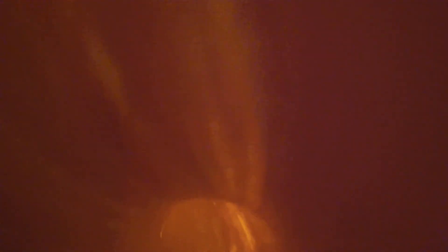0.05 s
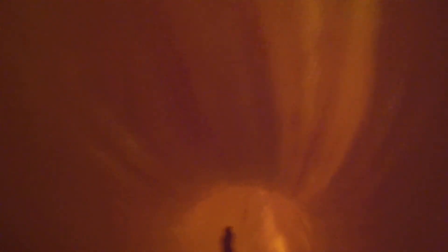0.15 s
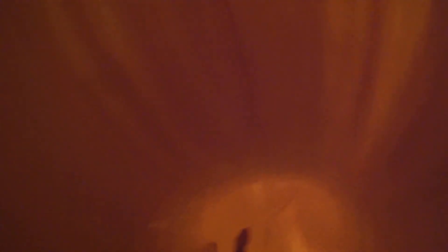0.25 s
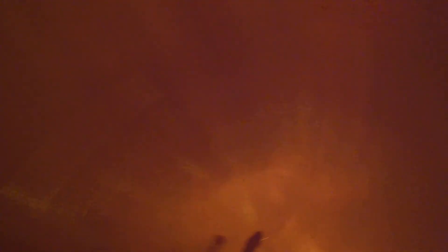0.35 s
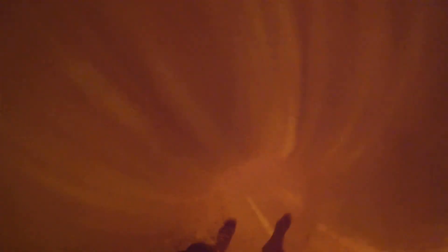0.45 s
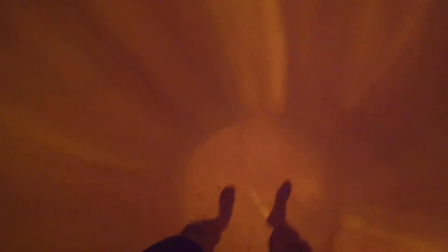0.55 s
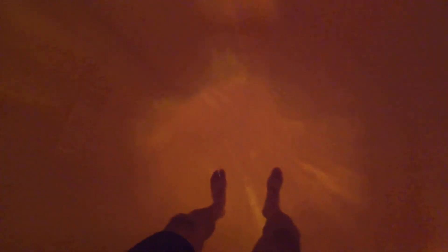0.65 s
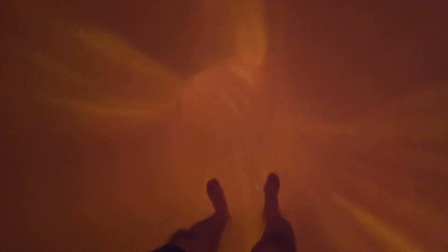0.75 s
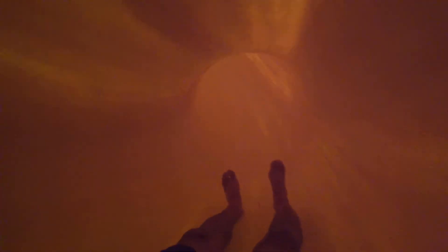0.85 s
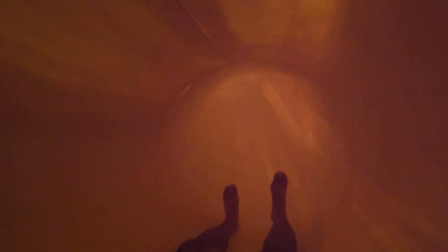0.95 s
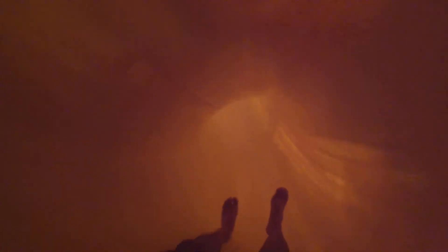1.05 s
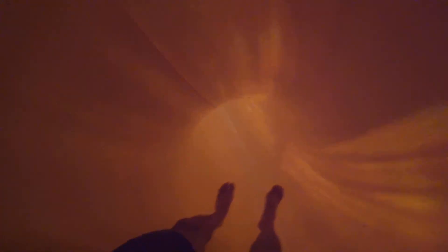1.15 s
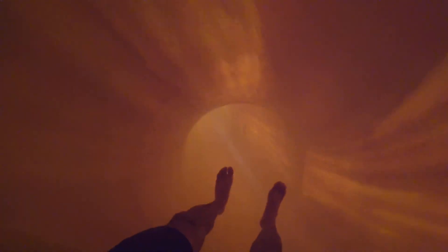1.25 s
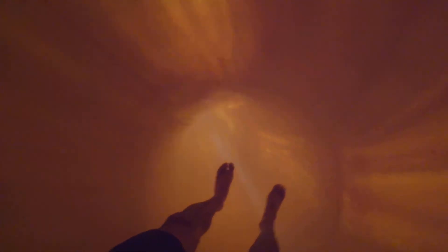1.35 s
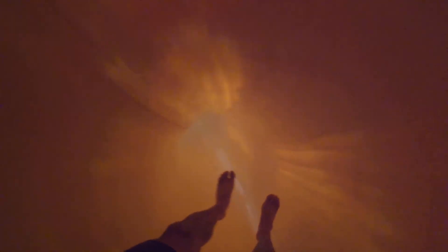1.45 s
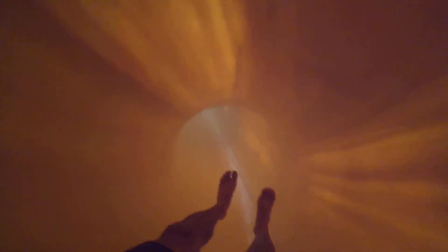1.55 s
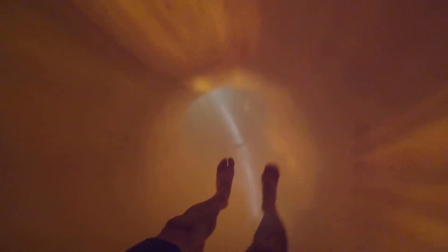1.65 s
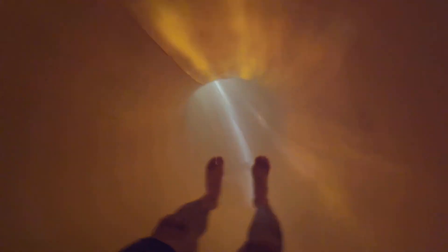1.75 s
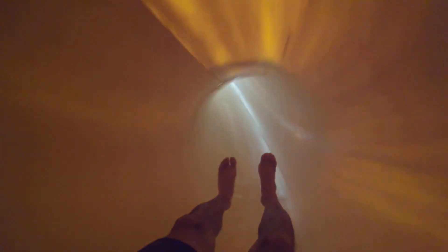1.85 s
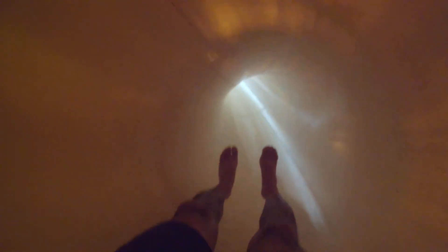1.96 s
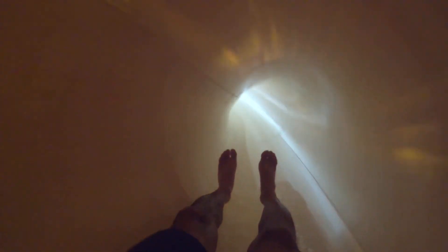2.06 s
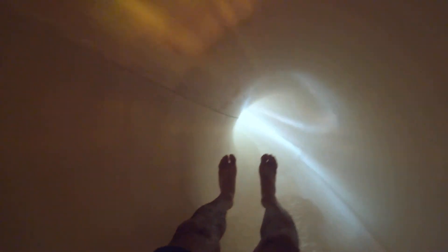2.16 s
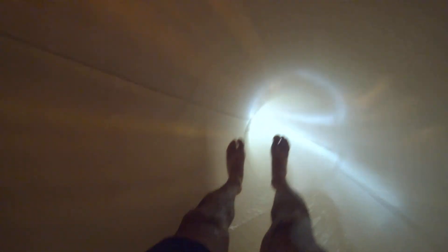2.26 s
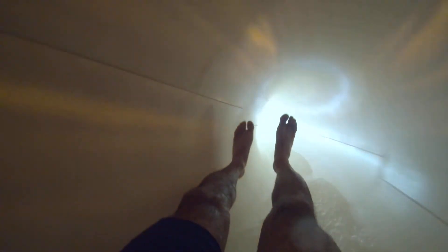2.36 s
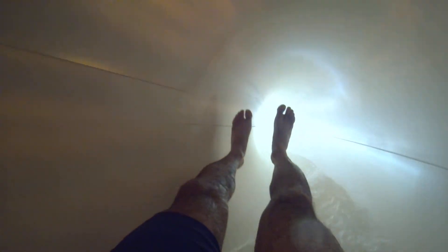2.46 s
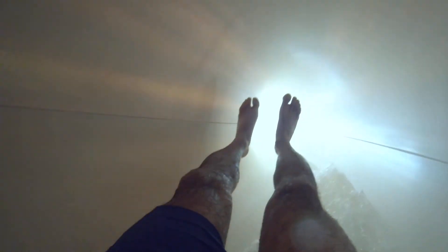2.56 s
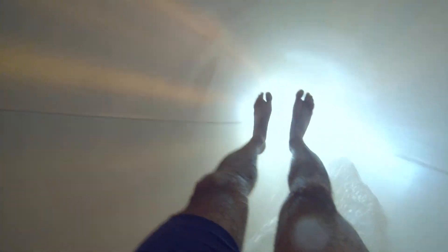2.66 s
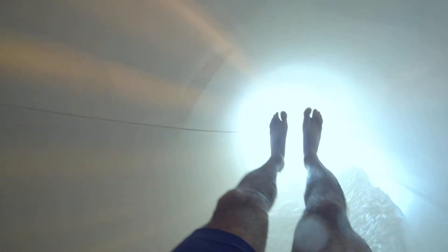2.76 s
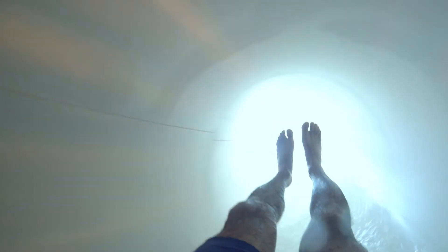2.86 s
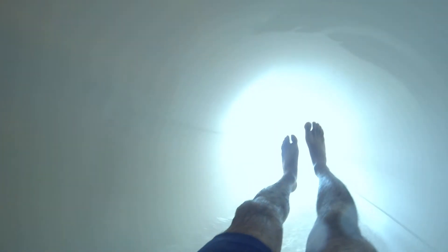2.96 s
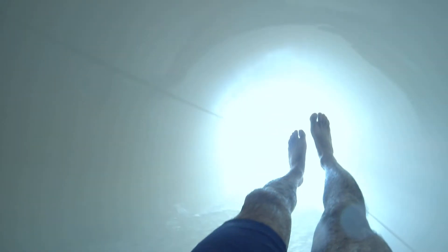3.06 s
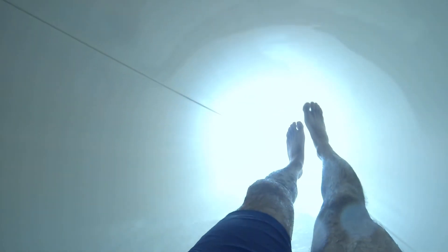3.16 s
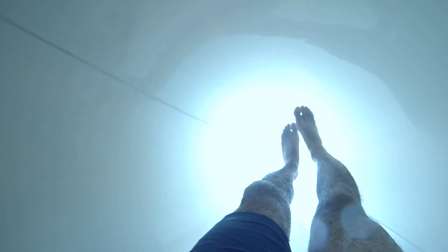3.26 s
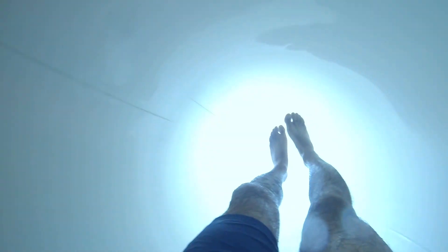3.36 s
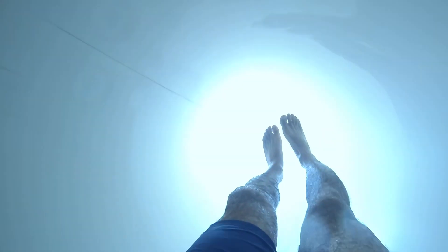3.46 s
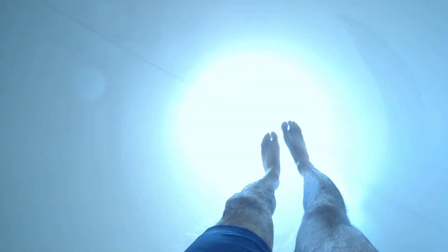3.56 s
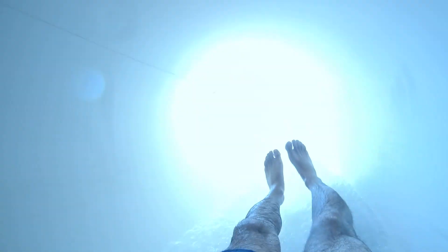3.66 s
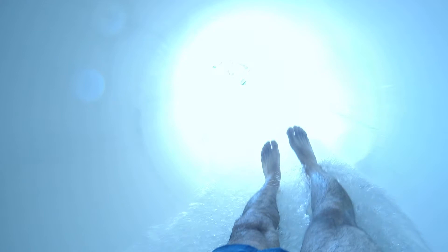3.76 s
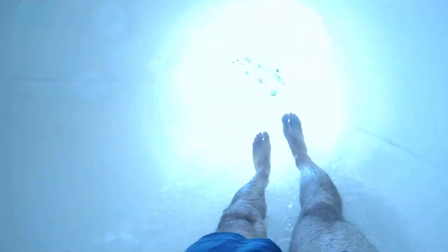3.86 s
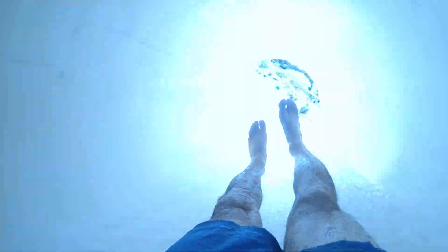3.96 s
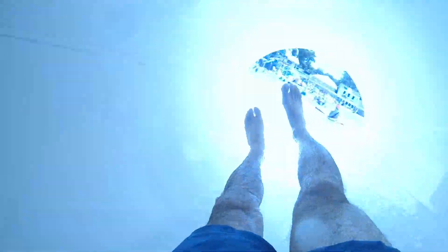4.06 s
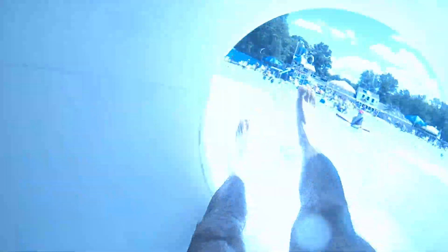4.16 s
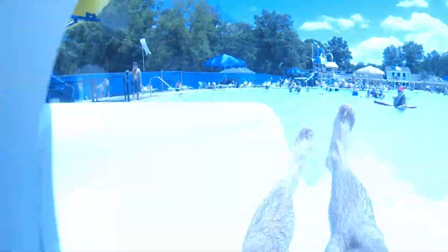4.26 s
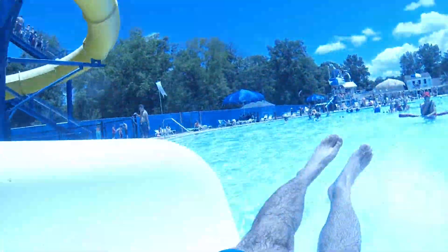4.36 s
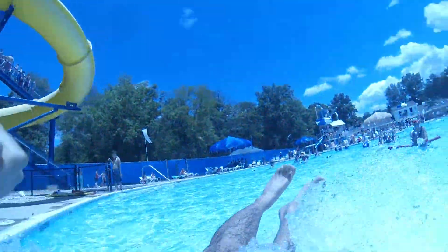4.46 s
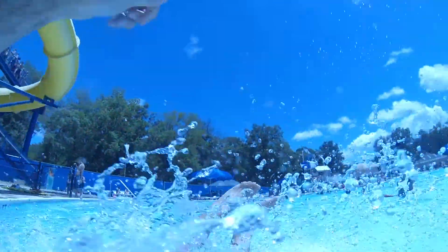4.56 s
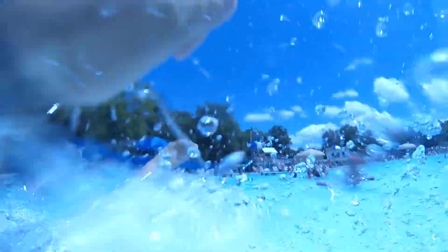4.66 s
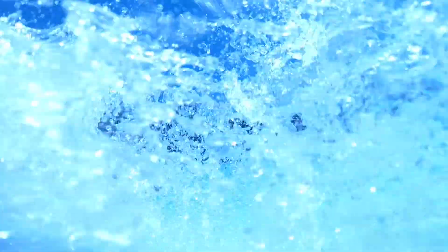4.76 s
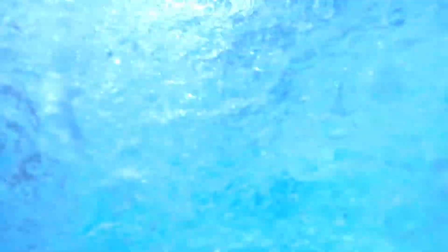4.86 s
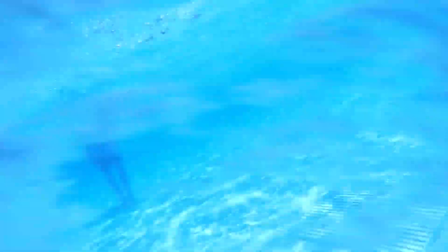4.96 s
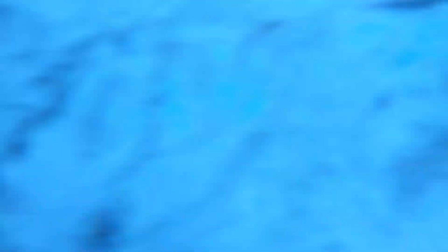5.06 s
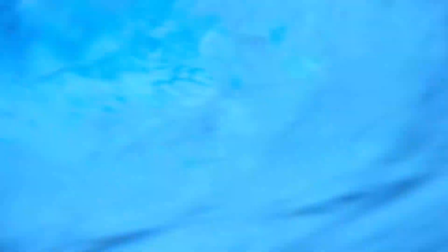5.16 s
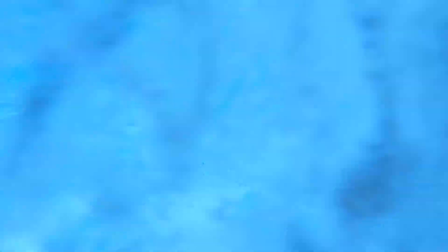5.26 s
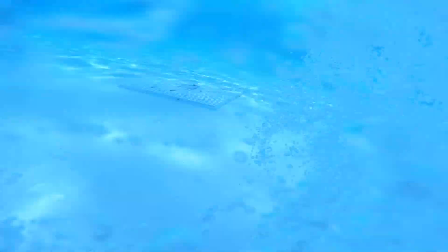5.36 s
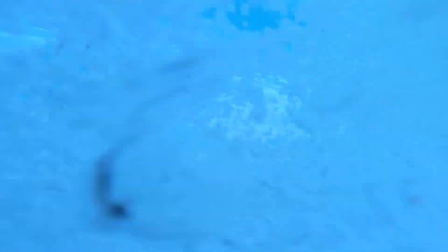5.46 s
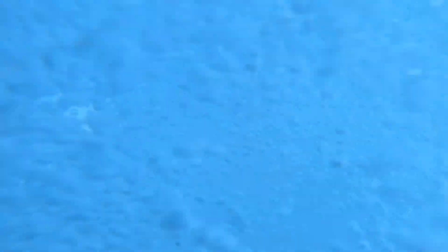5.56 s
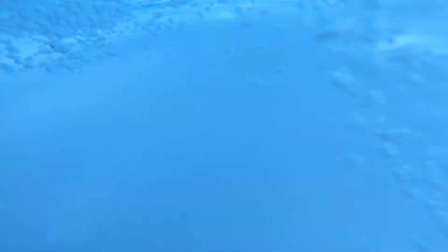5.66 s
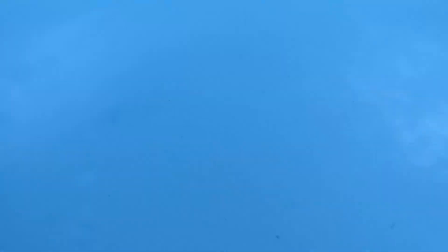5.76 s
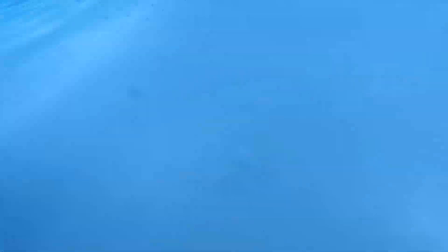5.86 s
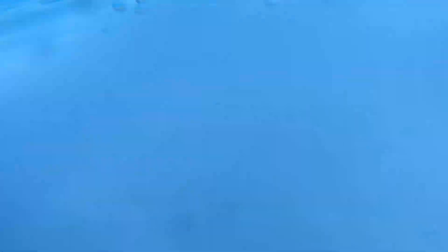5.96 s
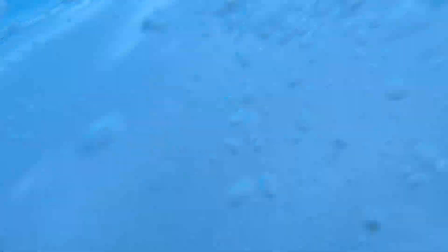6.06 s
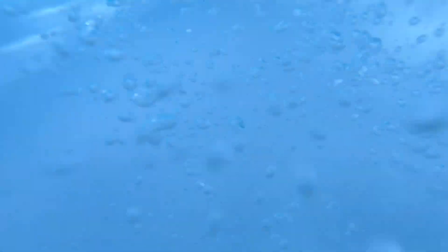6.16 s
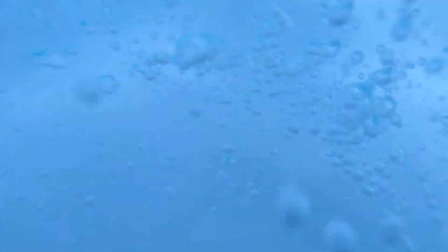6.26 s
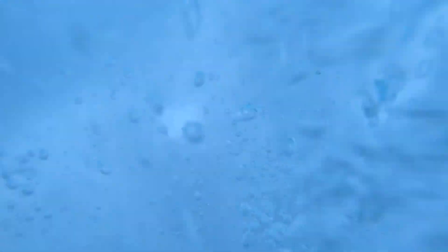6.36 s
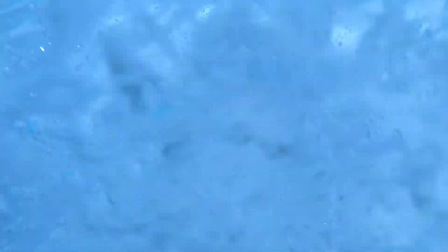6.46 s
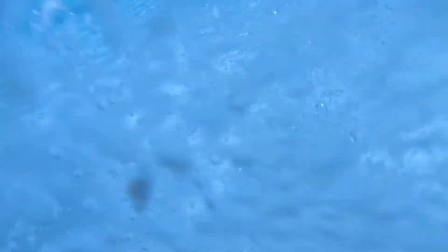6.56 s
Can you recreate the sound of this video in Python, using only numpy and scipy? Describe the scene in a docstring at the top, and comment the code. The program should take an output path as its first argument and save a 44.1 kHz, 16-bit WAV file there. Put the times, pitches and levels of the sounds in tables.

```python
"""Water hisses and a deep rumble and knocks shake a small camera in a sealed housing on a tube water slide.
Then it plunges into a pool: ragged spray, gurgle, tiny bubbles and hard blows of water on the microphone port.
Hiss and spray are noise shaped by droplets and by the housing; rumble, wash and hum are filtered noise.
Slosh, bubbles, snaps and blows are built from many short fading swings, each laid in at its own time.
At listed moments the steady sound drops quickly and climbs back."""
import sys
import numpy as np
from scipy import signal
from scipy.fft import rfft, irfft
from scipy.io import wavfile
from scipy.ndimage import uniform_filter1d

SR = 44100
rng = np.random.default_rng(int(sys.argv[2]) if len(sys.argv) > 2 else 0)


def file_out(sig):
    """Save sig as 16-bit WAV at sys.argv[1]."""
    # one column per channel
    cols = np.atleast_2d(sig).T
    # limit, then scale
    lim = np.clip(cols, -1, 1)
    pcm = np.round(lim * 32767).astype(np.int16)
    wavfile.write(sys.argv[1], SR, pcm)


N = 291494  # length in samples

# Water hiss before the dips. Each row: time in seconds, level in dB, brightness (treble level) in dB.
HISS_CURVE = [(0.0, -38.5, -12.5), (0.1, -29.5, -14), (0.7, -33.5, -11), (1.05, -24.5, -15.5),
              (1.6, -29.5, -15), (2.0, -32, -15.5), (2.3, -28.5, -16), (2.57, -29, -16.5), (2.75, -32, -14),
              (3.33, -29, -16), (3.75, -43, -12.5), (4.0, -30, -15.5), (4.42, -21, -15.5),
              (4.52, -28.5, -15), (4.68, -39.5, -11), (4.73, -22, -2), (4.78, -26, -7), (4.84, -17.5, -5),
              (4.88, -14.5, -6.5), (4.9, -11, -11.5), (5.05, -19, -9.5), (5.23, -33.5, -12),
              (5.27, -21.5, -14.5), (5.35, -26, -17), (5.69, -36.5, -10), (5.85, -49.5, -10),
              (5.89, -54, -31), (6.03, -43, -2), (6.09, -60, -19), (6.15, -48, -26), (6.26, -56, -13),
              (6.33, -17.5, -10.5), (6.45, -14, -6.5), (6.57, -30.5, 2.5), (6.61, -19.5, -13)]
# Low sounds before the dips. Each row: time in seconds, rumble in dB, slosh in dB, gurgle in dB.
LOW_CURVE = [(0.0, -25, -34, -46.5), (0.12, -14, -32, -44.5), (0.6, -10.5, -47, -48.5),
             (0.9, -21, -44, -42.5), (1.13, -12.5, -44, -40), (1.7, -18, -41, -47.5),
             (1.94, -10, -39.5, -43), (2.3, -21, -42.5, -46.5), (2.6, -22, -44.5, -47),
             (3.15, -22, -50, -43), (3.5, -11.5, -47, -48.5), (4.0, -19.5, -52, -48),
             (4.25, -14.5, -35, -35), (4.45, -12, -20.5, -31), (4.56, -5, -12, -40),
             (4.64, -17.5, -28, -40), (4.75, -13.5, -20, -36), (4.9, -18.5, -26, -22.5),
             (5.05, -17, -10.5, -19.5), (5.15, -30, -24, -32.5), (5.34, -19.5, -21, -17),
             (5.6, -27, -17.5, -25.5), (5.7, -22, -18, -25), (5.755, -26, -28, -46),
             (5.77, -23, -23, -26.5), (5.9, -28, -30, -37.5), (6.01, -31, -35.5, -44),
             (6.14, -23.5, -30, -31), (6.22, -23, -28, -34), (6.24, -19, -25, -28), (6.3, -22.5, -29, -27),
             (6.61, -25, -29, -23.5)]
# Colour of the rush inside the tube. Each row: frequency in Hz, relative level in dB.
TUBE_SPECTRUM = [(410, -28), (700, -23.5), (884, -24), (1130, -16), (1290, -2), (1470, -2), (1760, -13.5),
                 (2080, -13.5), (2310, -17.5), (3630, -20), (4350, -24), (5790, -26), (6340, -27),
                 (13400, -49), (15500, -49)]
# Colour of the spray in the pool. Each row: frequency in Hz, relative level in dB.
POOL_SPECTRUM = [(410, -27), (700, -14.5), (1010, -0.5), (1250, -1.5), (1430, 3), (1850, 0), (2590, -9),
                 (3630, -8), (4520, -15.5), (7500, -26.5), (8540, -30.5), (12900, -39), (15500, -44)]
# Fine colour of the housing. Each row: centre in Hz, width in Hz, boost or cut in dB.
HOUSING_COLOUR = [(2080, 30, 2), (4390, 150, -5.5), (4810, 110, 1.5), (6270, 89, -6), (10900, 370, 1.5),
                  (13100, 330, 3.5)]
# Air resonances across the tube. Each row: centre in Hz, width in Hz, relative level in dB.
TUBE_HUM = [(219, 70, -6.5), (514, 76, -8.5), (704, 130, -12)]
# Air pocket behind the port. Each row: pitch in Hz, relative level in dB, time to fade by 60 dB in seconds.
AIR_POCKET = [(1560, 9.5, 0.0058), (2145, 10.5, 0.0028), (3440, -7.5, 0.0095)]
# Drops and bubbles snapping at the port. Each row: start in seconds, level in dB,
# treble crack in dB relative to the body of the snap.
PORT_SNAPS = [(3.0952, -11.5, -31), (4.4176, -7, -46), (4.5305, 2.5, -9.5), (4.561, -14.5, -8.5),
              (4.594, -35, -13), (4.6044, -18, -19), (4.6116, -35, 1), (4.6503, -20, -34),
              (4.6795, -16.5, -21), (4.7153, -10.5, -6), (4.7368, -6.5, -18), (4.839, -2.5, -12),
              (5.1762, -15.5, -24), (5.2689, -16, 1), (5.372, -22, -25), (5.3948, -16, -29),
              (5.466, -15, -24), (5.5537, -17, -35), (5.697, 7, -41), (5.7654, -22, -28),
              (5.7935, -25.5, -33), (5.8144, -33, -7.5), (5.8287, -39, -17), (5.8464, -41, -28),
              (5.9434, -26.5, -8), (6.0054, -35, -4), (6.0208, -26, -6.5), (6.0307, -19.5, -26),
              (6.0644, -31, -18), (6.233, -30.5, -35), (6.2801, -22, -33), (6.3295, -6, -22),
              (6.3809, -8, -22), (6.4246, -3, -14), (6.5877, -8.5, -3)]
# Blows on the housing. Each row: start in seconds, level in dB, nominal pitch in Hz,
# fading time in cycles of that pitch, direction (+1 push, -1 pull).
HOUSING_BLOWS = [(0.359, -1, 41, 1.3, 1), (0.717, 4.5, 138, 0.46, 1), (1.784, 0.5, 57.7, 0.57, 1),
                 (2.02, -18, 121, 1.4, 1), (2.078, -15.5, 182, 2.5, 1), (2.589, -10.5, 47, 2.9, 1),
                 (3.353, -2, 35.8, 1.36, 1), (3.458, -7, 92, 1.8, 1), (3.478, -4.5, 69.5, 1, -1),
                 (3.496, -7, 60, 1.3, 1), (3.572, -10.5, 55, 1.7, -1), (3.617, -12.5, 54.7, 1.8, 1),
                 (3.682, -6.5, 55, 3.1, -1), (4.019, 4.5, 155, 1.4, 1), (4.429, -4, 39.6, 1.7, -1),
                 (4.528, 6.5, 63.5, 0.58, -1), (4.897, 15.5, 146, 0.25, -1), (5.032, -12, 120, 0.78, -1),
                 (5.042, -1.5, 100, 0.78, 1), (5.055, -1.5, 112, 0.85, 1), (5.066, -3.5, 80.5, 1.05, 1),
                 (5.348, 13, 426, 0.49, 1), (5.418, -7.5, 62.4, 3, 1), (5.698, 16, 420, 1, 1),
                 (5.934, 0.5, 120, 1.14, 1), (5.965, 0.5, 30, 0.41, 1), (6.132, -9, 61.5, 1.8, -1),
                 (6.1516, 17.5, 388, 0.85, 1), (6.234, -5, 121, 0.6, -1), (6.507, -4.5, 76, 0.67, 1)]
# Drops of the steady sound after jolts. Each row: time in seconds, nominal depth in dB.
LEVEL_DIPS = [(0.127, 3), (0.25, 4), (0.388, 22), (0.727, 25), (1.166, 8.5), (1.362, 4), (1.609, 1.5),
              (1.656, 2), (1.792, 8), (1.922, 9), (2.049, 11.5), (3.383, 10.5), (3.487, 9), (3.582, 3.5),
              (3.696, 6), (4.029, 29), (4.301, 3.5), (4.438, 18.5), (4.545, 10), (4.902, 18), (5.061, 12.5),
              (5.353, 11), (5.706, 16), (6.164, 24)]

PLUNGE_S = 4.5  # when the camera enters the pool, in seconds
FALL_S, RECOVER_S = 0.0092, 0.13  # seconds for a dip to fall, and to regain two thirds of it
RUMBLE_DIP, SLOSH_DIP, GURGLE_DIP = 0.61, 0.62, 0.83  # share of each dip (in dB) that a layer follows
TOP_HZ = 15150  # highest frequency the input lets through


def undb(db):
    """Turn dB into a plain gain."""
    return 10 ** (np.asarray(db) / 20)


def unit(x):
    """Scale a sound to an average (rms) level of 1."""
    return x / np.sqrt(np.mean(x ** 2))


def columns(table):
    """Draw each column of a curve table as a smooth line, one value per sample."""
    times, *values = np.transpose(table)
    return [np.interp(np.arange(N) / SR, times, v) for v in values]


def band(x, lo_hz, hi_hz, order=2):
    """Keep only the frequencies between two limits."""
    return signal.sosfilt(signal.butter(order, [lo_hz, hi_hz], "band", fs=SR, output="sos"), x)


def high_pass(order, hz):
    """Design a filter that keeps what lies above hz."""
    return signal.butter(order, hz, "high", fs=SR, output="sos")


def walk(rate):
    """Wander at random: rate new values a second, smoothed twice, with a spread near 1."""
    hold = int(SR / rate)
    steps = np.repeat(rng.standard_normal(N // hold + 1), hold)
    return 1.6 * uniform_filter1d(uniform_filter1d(steps, hold), hold)[:N]


def add(out, s, grain):
    """Lay a short sound into a longer one at time s in seconds."""
    i = int(s * SR)
    out[i:i + len(grain)] += grain[:N - i]


def ring(hz, cycles, glide=0.):
    """A fading swing that loses 9 dB in the given cycles; a positive glide makes its pitch rise."""
    turns = np.arange(int(5 * cycles * SR / hz)) * hz / SR
    return np.sin(2 * np.pi * turns * (1 + glide * turns / cycles)) * np.exp(-turns / cycles)


def submerged():
    """0 in the tube, rising to 1 just after the plunge."""
    return np.clip((np.arange(N) / SR - PLUNGE_S) / 0.086, 0, 1)


def dip_db():
    """Drops of the steady level: each falls fast and recovers by the same rule, and overlapping ones add."""
    times, depth_db = np.transpose(LEVEL_DIPS)
    coarse = np.arange(0, N, 32)  # every 32nd sample is fine enough
    since = coarse[:, None] / SR - times
    fall = np.clip(since / FALL_S + 0.5, 0, 1)
    recovery = np.exp(-np.maximum(since, 0) / RECOVER_S)
    return np.interp(np.arange(N), coarse, -(fall * recovery) @ depth_db)


def hiss_db():
    """Level of the hiss in dB, dips included."""
    return columns(HISS_CURVE)[0] + dip_db()


def rumble():
    """The housing sways on the rider: very deep noise with its peaks rounded off."""
    sway = band(rng.standard_normal(N), 14.8, 38.1, order=3)
    sway = np.tanh(0.45 * unit(sway))
    return unit(sway) * undb(columns(LOW_CURVE)[0] + RUMBLE_DIP * dip_db())


def slosh():
    """Water sloshes past the housing: 500 low, quickly fading swings of unequal loudness."""
    out = np.zeros(N)
    for place, size, loud in rng.random((500, 3)):
        gain = undb(-1.2 * np.log(1 - loud))
        add(out, place * N / SR, gain * ring(55 * 3.5 ** size, 0.8))
    out = band(out, 59, 400)
    return unit(out) * undb(columns(LOW_CURVE)[1] + SLOSH_DIP * dip_db())


def tube_hum():
    """Air resonances across the tube, heard as narrow bands of noise that waver in level."""
    hum = np.zeros(N)
    for hz, width, db in TUBE_HUM:
        level = undb(db + 2 * walk(6.51))
        hum += level * unit(band(rng.standard_normal(N), hz - width / 2, hz + width / 2, order=1))
    return hum


def bursting_bubbles():
    """4000 bubbles, each a short ping whose pitch rises slightly."""
    bubbles = np.zeros(N)
    for place, size, loud in rng.random((4000, 3)):
        gain = undb(-3 * np.log(1 - loud))
        add(bubbles, place * N / SR, gain * ring(250 * 4.5 ** size, 1.6, glide=0.03))
    return unit(band(bubbles, 200, 950, order=4))


def gurgle():
    """A steady wash of noise, joined by hum in the tube and by bursting bubbles in the pool."""
    wash = unit(band(rng.standard_normal(N), 170, 900, order=4))
    in_pool = submerged()
    mix = 0.6 * wash + tube_hum() * (1 - in_pool) + 1.28 * bursting_bubbles() * in_pool
    return mix * undb(columns(LOW_CURVE)[2] + GURGLE_DIP * dip_db())


def fizz():
    """Tiny bubbles in the pool: short high pings, weaker when higher, louder where the hiss is louder."""
    out = np.zeros(N)
    for place, loud, pitch in rng.random((520, 3)):
        hz = 1400 * 7 ** pitch
        ping = ring(hz, 6.3, glide=0.0063)
        # the neck of the bubble pinches off over a few cycles
        ping = ping * (1 - np.exp(-np.arange(len(ping)) * hz / (2.5 * SR)))
        gain = undb(-3.5 * np.log(1.02 - loud) - 16 * pitch)
        add(out, PLUNGE_S + place * (N / SR - PLUNGE_S), gain * ping)
    return out * undb(-6.5 + 0.72 * hiss_db())


def water(rate, scatter_db, flicker_db, patchy_db):
    """Smooth noise swelling with droplets of unequal size, in gusts, with each band wavering alone."""
    count = int(rate * N / SR)  # rate is droplets per second
    drops = np.zeros(N)
    drops[rng.integers(0, N, count)] = undb(scatter_db * rng.exponential(size=count))
    # the energy of each droplet fades over 2 ms
    energy = signal.lfilter([1], [1, -np.exp(-1 / (0.002 * SR))], drops ** 2)
    spray = np.sqrt(0.3 + unit(energy))
    x = rng.standard_normal(N) * spray * undb(flicker_db * walk(60))
    edges = 600 * 2 ** np.arange(0, 5.1, 0.5)  # half-octave bands from 600 Hz up
    out = np.zeros(N)
    for lo, hi in zip(edges, edges[1:]):
        # filter twice, the second time backwards
        part = band(band(x, lo, hi)[::-1], lo, hi)[::-1]
        out += part * undb(patchy_db * walk(70))
    return out


def coloured(x, spectrum):
    """Shape a sound by a spectrum and the housing; rms 1 in the band of the housing's resonance."""
    f = np.arange(N // 2 + 1) * SR / N + 1e-3
    hz, db = np.transpose(spectrum)
    housing_db = sum(d * np.exp(-((f - c) / w) ** 2 / 2) for c, w, d in HOUSING_COLOUR)
    shape_db = np.interp(np.log(f), np.log(hz), db, left=-90)
    y = irfft(rfft(x) * undb(shape_db + housing_db), N)
    return y / np.std(band(y, 1000, 2200, order=4))


def hiss():
    """Even rush in the tube, ragged spray in the pool; brightness sets the part above the resonance."""
    bright_db = columns(HISS_CURVE)[1]
    rush = coloured(water(3000, 0.4, 0.29, 1.0), TUBE_SPECTRUM)
    spray = coloured(water(900, 2.2, 1.72, 1.7), POOL_SPECTRUM)
    out = np.zeros(N)
    for x, share in (rush, 1 - submerged()), (spray, submerged()):
        treble = signal.sosfiltfilt(high_pass(2, 2800), x)
        out += share * (x - treble + unit(treble) * undb(bright_db))
    return out * undb(hiss_db())


def snap(treble_db):
    """A burst of a few ms that rings the air pocket, plus a dry crack."""
    t = np.arange(int(0.03 * SR)) / SR
    envelope = np.exp(-t / 0.0016) * (1 - np.exp(-t / 0.00023))
    burst = rng.standard_normal((2, len(t))) * envelope
    pocket = sum(undb(db) * np.sin(2 * np.pi * hz * t) * 1000 ** (-t / t60) for hz, db, t60 in AIR_POCKET)
    body = band(np.convolve(burst[0], pocket)[:len(t)], 1100, 4000)
    crack = band(burst[1], 1700, 6650)
    return body / np.abs(body).max() + undb(treble_db) * crack / np.abs(crack).max()


def snaps():
    """Drops and bubbles snap at the port, each ringing the air pocket behind it."""
    out = np.zeros(N)
    for s, db, treble_db in PORT_SNAPS:
        add(out, s, undb(db) * snap(treble_db))
    return out


def blows():
    """Each blow throws the microphone's membrane one way; it swings back ever more slowly as it fades."""
    out = np.zeros(N)
    for s, db, hz, cycles, way in HOUSING_BLOWS:
        turns = np.arange(int(6 * cycles * SR / hz)) * hz / SR
        # the logarithm stretches each swing more than the one before
        swing = np.sin(2 * np.pi * np.log(1 + 1.364 * turns) / 1.322) * np.exp(-turns / cycles)
        soft = 1 - np.exp(-(turns / 0.19) ** 2)  # water cushions the contact
        add(out, s, np.sign(way) * undb(db) * swing * soft)
    return out


def scene():
    """All sources meet at the one microphone."""
    low = rumble() + slosh() + gurgle()
    return (low + fizz() + hiss() + snaps() + blows())[None]


def record(dry):
    """The input weakens the deepest bass, overloads on hard blows and cuts the top."""
    x = signal.sosfilt(high_pass(1, 14), dry)
    x = x / (1 + np.abs(x) ** 8) ** (1 / 8)  # leaves quiet sound alone, holds peaks below 1
    return signal.sosfilt(signal.ellip(10, 0.1, 70, TOP_HZ, fs=SR, output="sos"), x)


dry = scene()
out = record(dry)
file_out(out)
```